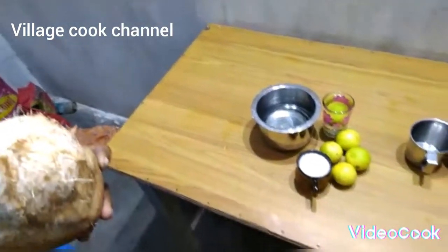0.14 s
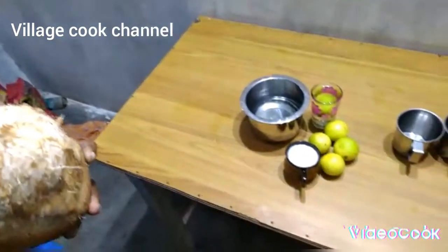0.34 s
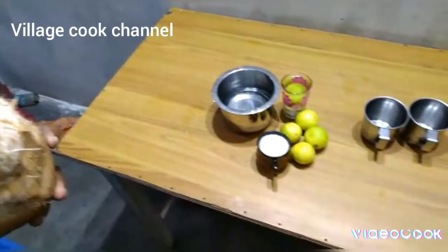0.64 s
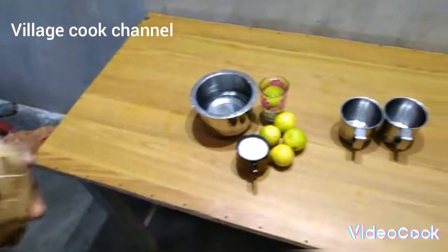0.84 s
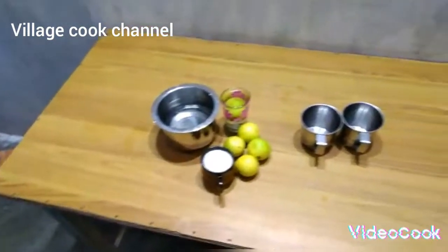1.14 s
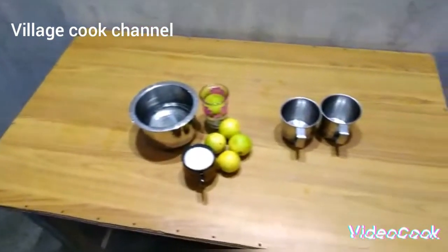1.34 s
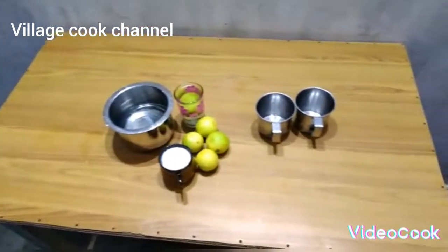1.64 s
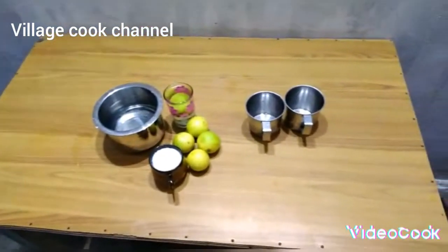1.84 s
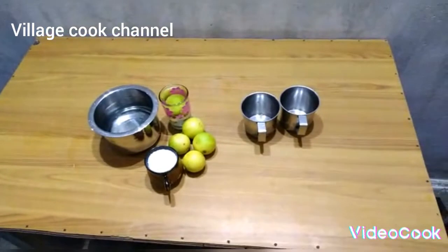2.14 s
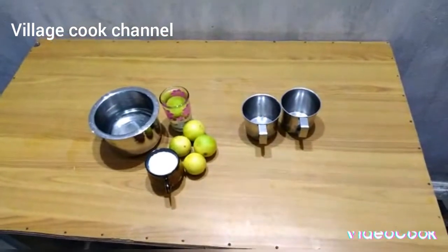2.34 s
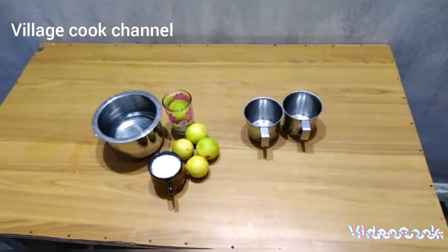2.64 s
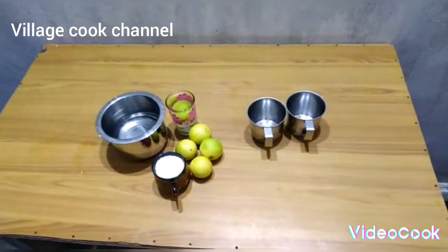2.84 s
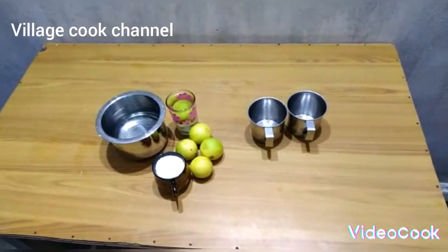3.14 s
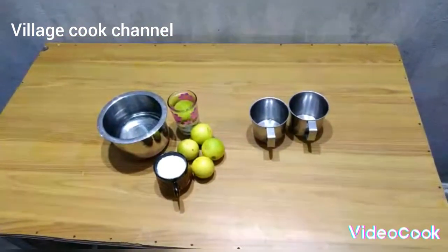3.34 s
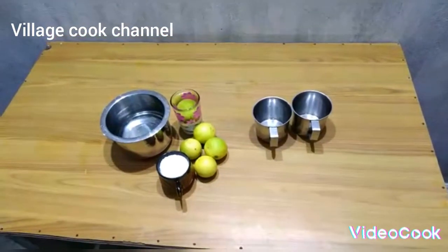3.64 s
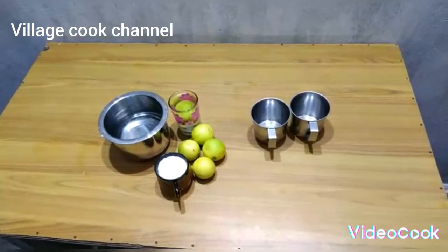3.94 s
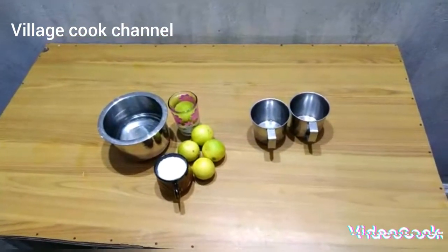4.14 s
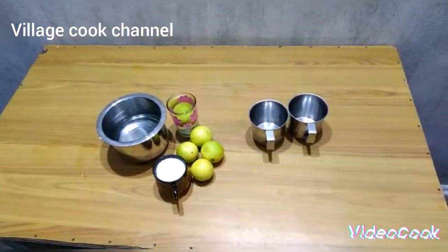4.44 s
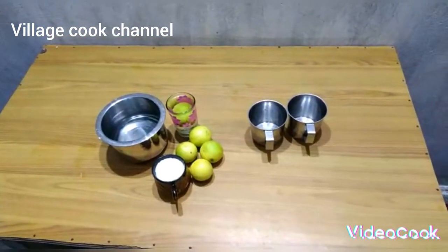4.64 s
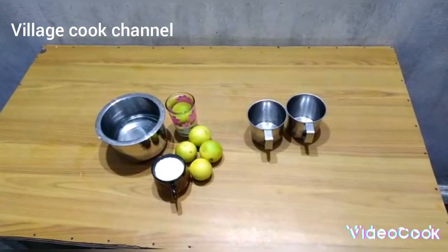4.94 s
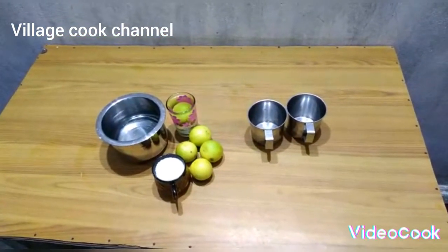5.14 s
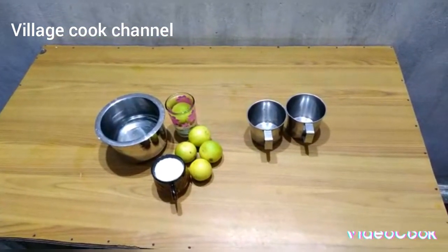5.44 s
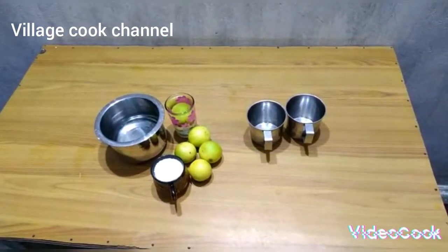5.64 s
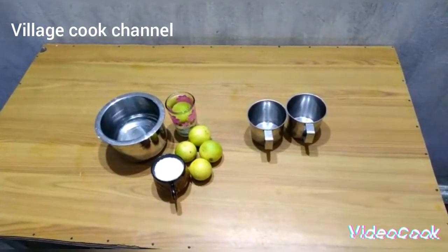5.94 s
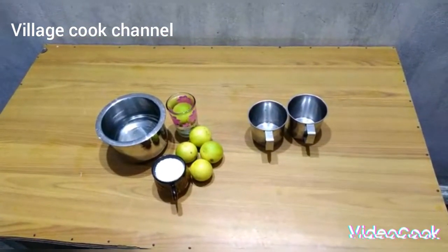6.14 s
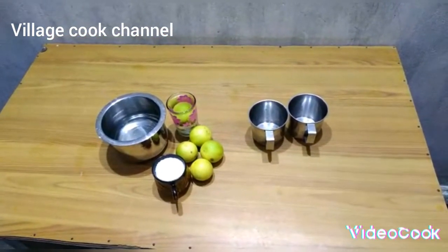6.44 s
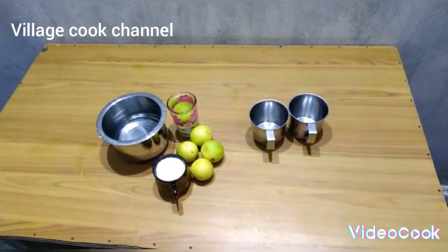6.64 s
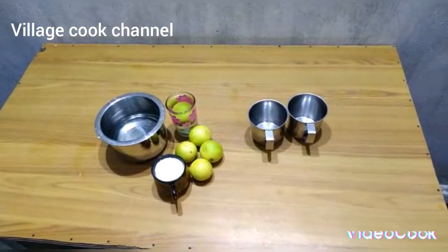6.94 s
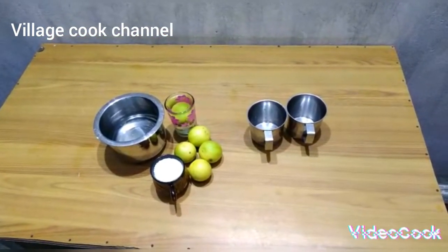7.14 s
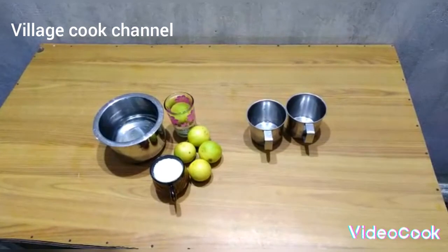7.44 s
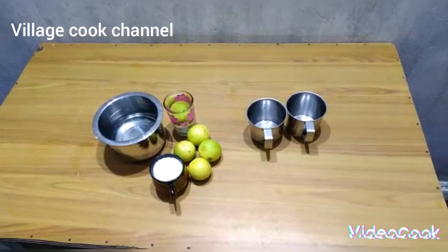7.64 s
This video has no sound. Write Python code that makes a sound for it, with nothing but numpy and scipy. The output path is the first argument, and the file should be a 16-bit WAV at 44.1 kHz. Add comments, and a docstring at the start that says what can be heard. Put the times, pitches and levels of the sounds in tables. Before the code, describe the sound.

Someone chops a coconut with uneven strokes, each dull tap followed by a hard crack of the blade through the husk. There are six hard cuts, slightly overloading the close microphone and echoing shortly in a hard-walled kitchen. Quiet snapping and rubbing of fibres fills some of the gaps. Underneath lies a soft hiss, louder in the first second, with barely audible far-off hoots and thin wavering tones.

```python
"""Chopping a green coconut

A heavy blade works the husk in a bare, ringing kitchen. Light knocks on the hollow nut alternate with
hard cuts that split the fibres; in between, the husk ticks and rustles. Faint thin tones and low hoots
waver over background hiss. A phone with two ports widens the stereo and overloads on the hardest cuts."""
import sys
import numpy as np
from scipy import signal
from scipy.fft import rfft, irfft
from scipy.io import wavfile
from scipy.ndimage import uniform_filter1d

SR = 44100
rng = np.random.default_rng(int(sys.argv[2]) if len(sys.argv) > 2 else 0)


def unload_audio(sound):
    """Save the sound as a 16-bit wav file, at the path given as the first command line argument."""
    columns = np.transpose(np.atleast_2d(sound))
    # keep every value between -1 and 1, then stretch to whole-number steps
    steps = np.round(np.clip(columns, -1, 1) * 32767)
    wavfile.write(sys.argv[1], SR, steps.astype(np.int16))


N = 343494
PORT_S, PORT_LIKENESS = 0.0004083, 0.87  # travel time between the ports; their likeness in the bass


def hard_cuts():
    """The blade splits the fibres: a bright crack with little ring from the shell."""
    # t/s, level/dB, thud/dB, knock f/Hz, knock/dB, treble/dB, rasp f/Hz, rasp/dB, splitting time/s
    hits = [(.8359, -17, 10, 719.4, 4.5, -3, 6780, 6, 0.0031),
            (1.7383, -20, -0.5, 575, 2.5, -3.5, 1546, 1.5, 0.0023),
            (2.6252, -20, -3.5, 994, 1, -2, 8500, 6, .0025),
            (4.0948, -19, 2, 1052, 6.5, -1, 5860, 5.5, 0.0021),
            (5.8409, -20, 5, 483, 3.5, -6.5, 2300, 3, .0018),
            (6.8015, -18.5, -8, 1260, 8, -3, 6500, 2.5, 0.0016)]
    # tone of a cut: f/Hz, level/dB
    spectrum = [(40, -32), (100, -18), (250, -7.5), (450, -1.5), (1000, 1.5), (1600, -2.5), (2200, 2.5),
                (3200, -7), (4200, -7), (5300, -12), (8000, -15.5), (11500, -14), (13500, -20.5),
                (15800, -35)]
    return blows(hits, spectrum, direct_db=-1, shell_db=-8)


def light_knocks():
    """The blade taps the nut: shorter and darker, with more of the hollow shell."""
    # t/s, level/dB, thud/dB, knock f/Hz, knock/dB, treble/dB, rasp f/Hz, rasp/dB, splitting time/s
    hits = [(.4431, -20.5, -2, 859, 8.2, 2, 3970, 2.5, 0.00045),
            (1.3802, -48.5, 4.5, 597.3, 1.8, 7.5, 1460, 4.4, .0015),
            (2.2566, -34, -3, 845, 4.4, 1, 3300, 3.3, 0.00061),
            (3.7046, -35, 3, 620, 4.7, -2, 8800, 5.7, .00066),
            (5.4578, -43.5, 8.5, 484, 2.6, 3.5, 2300, 2, 0.0014),
            (6.4606, -36, 5, 795, 2.04, 3, 1450, 3, 0.0013)]
    # tone of a knock: f/Hz, level/dB
    spectrum = [(40, -26.5), (100, -17.5), (250, -7.5), (450, -1.5), (750, 1), (1000, -7), (1700, -12),
                (2250, -10.5), (3200, -23.5), (5000, -31.5), (9000, -38.5), (15500, -50)]
    return blows(hits, spectrum, direct_db=2.5, shell_db=2)


def blows(hits, spectrum, direct_db, shell_db, thud_hz=300, treble_hz=3500):
    """Each blow thuds, knocks the nut at a pitch set by the spot struck, and rasps through husk."""
    out = np.zeros((2, N))
    for start, level_db, thud_db, knock_hz, knock_db, treble_db, rasp_hz, rasp_db, split_s in hits:
        def colour(hz):
            thud = thud_db / (1 + (hz / thud_hz) ** 2)
            treble = treble_db * hz ** 2 / (hz ** 2 + treble_hz ** 2)
            knock = knock_db * bump(hz, knock_hz, octaves=.3)
            rasp = rasp_db * bump(hz, rasp_hz, octaves=.2)
            return read(spectrum, hz) + thud + treble + knock + rasp
        add(out, start, strike(colour, level_db, split_s, direct_db, shell_db))
    return out


def strike(colour, level_db, split_s, direct_db, shell_db, size=32768, grain=.6):
    """A burst of fibre snaps rings the shell, reaches the ports by short paths, then fills the room."""
    # modes of the hollow shell: f/Hz, relative level/dB, t60/s
    nut_modes = [(474, -5, 0.077), (660, -5, .06), (816, 3.5, 0.14), (1388, 2.5, .15), (2320, -2.5, 0.015)]
    # straight path, then off table and wall: delay/s, left port's lag/s, level/dB
    paths = [(0, .0001, -1), (.0013, -.0001, -4), (.0028, .00004, -7.5)]
    # how the crack beams at the phone: f/Hz, relative level/dB
    beam = [(100, -5.5), (500, -3), (1100, -11.5), (2200, -2), (4000, 3.5), (12000, 1)]
    t, hz = np.arange(size) / SR, np.fft.rfftfreq(size, 1 / SR)
    snaps = rng.standard_normal(size) * np.exp(grain * rng.standard_normal(size) - t / split_s)
    burst = rfft(snaps)
    burst_db = 10 * np.log10(uniform_filter1d(abs(burst) ** 2, size=60) + 1e-12)
    burst /= causal(burst_db)  # flattened, so the nut sets the colour
    ring = sum(ringing(t, mode_hz * rng.uniform(.91, 1.02), db + shell_db, t60, np.pi / 2)
               for mode_hz, db, t60 in nut_modes)
    shell = 1 + rfft(ring)
    direct = 0
    for delay_s, lag_s, db in paths:
        arrival_s = delay_s * rng.uniform(.7, 1.3) + np.array([[lag_s], [0]])  # the nut shifts in hand
        direct = direct + gain_of(db) * np.exp(-2j * np.pi * hz * arrival_s)
    space = direct * causal(read(beam, hz) + direct_db) + rfft(kitchen())
    sound = irfft(burst * shell * causal(colour(hz)) * space)
    attack_rms = np.sqrt(np.mean(sound[:, :SR // 10] ** 2))
    return gain_of(level_db) * sound / attack_rms


def husk(centre_db=10, clumping=.71):
    """Single fibres snap, and rubbing sets off swarms of tiny ones."""
    # fibres snapping: t/s, level/dB
    ticks = [(2.089, -75.5), (4.033, -59), (5.376, -63), (5.792, -52), (6.766, -57.5), (7.363, -70),
             (7.392, -61.5), (7.64, -69)]
    # tone of a fibre: f/Hz, level/dB
    fibre = [(100, -28.5), (1000, -9.5), (2300, 10.5), (4000, -5.5), (7000, -3.5), (12000, -14),
             (16000, -19)]
    # husk rubbing under hand and blade: t/s, length/s, relative level/dB, centre f/Hz
    rubs = [(2.06, 0.066, -69, 7990), (4.69, 0.11, -69, 2914), (5.13, 0.099, -66.5, 4010),
            (5.253, 0.065, -56, 8880), (5.36, 0.2, -65, 2788), (5.6, 0.22, -66.5, 2480),
            (7.05, .25, -71.5, 1480), (7.54, 0.087, -58.5, 2150)]
    snaps, swarm = np.zeros((2, N)), np.zeros(N)
    for start, db in ticks:
        add(snaps, start, strike(lambda hz: read(fibre, hz), db, .0014, direct_db=1, shell_db=-12))
    hz = np.fft.rfftfreq(SR, 1 / SR)
    for start, length, db, centre_hz in rubs:
        grains = rng.standard_normal(SR) * np.exp(clumping * np.minimum(rng.standard_normal(SR), 2))
        colour_db = read(fibre, hz) + centre_db * bump(hz, centre_hz, octaves=1)
        rustle = unit_rms(irfft(rfft(grains) * gain_of(colour_db)))
        stroke = np.hanning(round(length * SR))
        add(swarm, start, gain_of(db) * stroke * rustle[:len(stroke)])
    return snaps + in_kitchen(swarm, direct=1.35, wet=1.53)


def kitchen(size=32768, build_s=.002, hold_s=.035, modes_db=5, late_db=-2, knee_s=.27):
    """Dense wall echoes that hold briefly and then die band by band, plus standing waves."""
    # reverb time: f/Hz, t60/s
    decay = [(80, 0.37), (300, 0.5), (700, 0.39), (1400, 0.44), (3000, 0.37), (6000, 0.37), (10000, .31),
             (15000, 0.19)]
    # standing waves: f/Hz, relative level/dB
    room_modes = [(113, 5), (165, -0.5), (233, 1), (277, 10.5), (438, 3.5), (479, 4), (573, 1.5), (603, 0),
                  (733, 1), (846, 1), (991, 2.5), (1037, 1), (1072, 4.5), (1147, 3), (1178, -2.5),
                  (1304, -2), (1379, 3)]
    t = np.arange(size) / SR
    hz, frame_s, bands = signal.stft(diffuse_noise(size), SR, nperseg=256)
    dying_s = np.hypot(frame_s, hold_s) - hold_s
    bands *= gain_of(-60 * dying_s / read(decay, hz)[:, None])
    tail = signal.istft(bands, SR, nperseg=256)[1][:, :size]
    tail /= np.linalg.norm(tail[0])
    for mode_hz, db in room_modes:
        phase = 2 * np.pi * rng.random() + rng.standard_normal((2, 1))
        t60 = .57 * (500 / mode_hz) ** .38
        tail += ringing(t, mode_hz, db + modes_db, t60, phase)
    build_up = 1 - np.exp(-(t / build_s) ** 2)
    return tail * build_up * gain_of(late_db * (t / knee_s) ** 2)  # the end dies faster


def in_kitchen(sound, direct, wet):
    """A mono sound blended with its stereo wall echoes."""
    return direct * sound + wet * signal.fftconvolve(sound[None], kitchen(), axes=1)[:, :N]


def thin_tones(swing_hz=3.5, depth=.013, growth_per_s=.16, fade_db_per_s=8):
    """Thin tones swing ever wider about their pitch; the room's echoes beat with the glide."""
    # thin wavering tones, with one brief bright flare in the last:
    # t/s, length/s, centre f/Hz, relative level/dB
    notes = [(.19, 0.1, 1454, -56), (3.873, 0.36, 1320, -53.5), (5.125, .46, 1490, -53.5),
             (5.337, .02, 1465, -46.5)]
    out = np.zeros(N)
    for start, length, hz, db in notes:
        t = np.arange(0, length, 1 / SR)
        swing = (depth + growth_per_s * t) * np.cos(2 * np.pi * swing_hz * t)
        add(out, start, tone(hz * (1 + swing), db - fade_db_per_s * t, flutter_db=3.3, ramps=.33))
    return in_kitchen(out, direct=.8, wet=.71)


def hoots(sag_hz_per_s=60, fade_db_per_s=22.5):
    """Low tones from far off, each sinking as it fades."""
    # far-off hoots: t/s, length/s, starting f/Hz, level/dB
    notes = [(1.42, 0.34, 439, -61), (2.35, 0.22, 435, -59), (3.239, 0.28, 447, -58.5),
             (3.55, 0.17, 393, -62), (4.481, 0.33, 457, -59.5), (6.241, .3, 442, -60),
             (6.573, 0.27, 399, -62), (7.162, 0.28, 398, -62.5)]
    out = np.zeros(N)
    for start, length, hz, db in notes:
        t = np.arange(0, length, 1 / SR)
        add(out, start, tone(hz - sag_hz_per_s * t, db - fade_db_per_s * t, flutter_db=3.5, ramps=.27))
    return out


def hiss(floor_db=-65, opening_db=-49, sag_db_per_s=4.5, hold_s=.86, release_s=.24,
         patchy_db=1.05, mids_hz=1600, rumble_hz=160, rumble_db=3.5):
    """Background hiss: a louder rush at first, then a steady floor with soft low swells."""
    # tone of the hiss: f/Hz, level/dB
    spectrum = [(30, -8.5), (100, -3.5), (250, 0), (450, -2), (700, -4.5), (1400, -9), (2300, -10.5),
                (3600, -14.5), (6500, -17), (11000, -23.5), (15500, -27)]
    # gentle swells: t/s, length/s, level/dB
    swells = [(1.0, 1.0, -65.5), (2.201, .8, -65), (3.6, 0.93, -59.5), (4.306, .9, -66.5),
              (4.997, 1.2, -59.5), (7.45, .7, -65)]
    hz, t, bands = signal.stft(diffuse_noise(N), SR, nperseg=1024, noverlap=768)
    patches = uniform_filter1d(rng.standard_normal(bands.shape[1:]), size=6, axis=0)
    patches = unit_rms(uniform_filter1d(patches, size=8, axis=1))
    held = np.clip(1 - (t - hold_s) / release_s, 0, 1)
    rush = held * gain_of(opening_db - sag_db_per_s * t)
    for start, length, db in swells:
        rush += gain_of(db) * np.sin(np.pi * np.clip((t - start) / length, 0, 1))
    mids, rumble = (1 / (1 + (hz[:, None] / edge_hz) ** 4) for edge_hz in (mids_hz, rumble_hz))
    mids_db = .3 + 5 * np.exp(-t / .35)  # extra body at the very start
    level = np.hypot(rush * gain_of(mids_db * mids + rumble_db * rumble), gain_of(floor_db))
    colour = unit_rms(gain_of(read(spectrum, hz)))[:, None]
    bands *= colour * level * gain_of(patchy_db * patches)
    return signal.istft(bands, SR, nperseg=1024, noverlap=768)[1][:, :N]


def diffuse_noise(size):
    """Noise from all sides: alike at both ports only where the waves are long."""
    left, other = rfft(rng.standard_normal((2, size)))
    same = PORT_LIKENESS * np.sinc(2 * PORT_S * np.fft.rfftfreq(size, 1 / SR))
    return irfft([left, same * left + np.sqrt(1 - same ** 2) * other], size)


def tone(hz, db, flutter_db, ramps, waver=.008):
    """A sine that fades in and out, unsteady in pitch and level."""
    drift, flutter = (unit_rms(uniform_filter1d(uniform_filter1d(noise, 600), 400))[:len(hz)]
                      for noise in rng.standard_normal((2, SR)))
    turns = np.cumsum(hz * (1 + waver * drift)) / SR
    envelope = gain_of(db + flutter_db * flutter) * signal.windows.tukey(len(hz), ramps)
    return envelope * np.sin(2 * np.pi * turns)


def ringing(t, mode_hz, db, t60, phase):
    """A dying sine whose spectral peak stands at db."""
    fade = gain_of(-60 * t / t60)
    return gain_of(db) * 2 * fade / fade.sum() * np.sin(2 * np.pi * mode_hz * t + phase)


def causal(db):
    """The spectrum of the tightest pulse that has these levels."""
    log_gain = np.log(gain_of(np.r_[db, db[-2:0:-1]]))
    return np.exp(signal.hilbert(log_gain).conj())[:len(db)]


def bump(hz, centre_hz, octaves):
    """A bell of height 1 on the log-frequency axis."""
    return np.exp(-(np.log2((hz + 1) / centre_hz) / octaves) ** 2)


def read(points, hz):
    """A breakpoint curve on the log-frequency axis."""
    f, value = np.transpose(points)
    return np.interp(np.log(hz + 1), np.log(f + 1), value)


def gain_of(db):
    return 10 ** (np.asarray(db) / 20)


def unit_rms(x):
    return x / np.sqrt(np.mean(x ** 2) + 1e-20)


def add(mix, start_s, sound):
    part = mix[..., round(start_s * SR):][..., :sound.shape[-1]]
    part += sound[..., :part.shape[-1]]


def scene():
    """Blows, husk, faint tones and hiss as they reach the two ports."""
    return hard_cuts() + light_knocks() + husk() + thin_tones() + hoots() + hiss()


def record(dry, cancel=.9, dip_hz=4910, dip_db=-5.5, edge_hz=16400):
    """Each channel subtracts the other port, delayed, for width; then EQ, overload and band limit."""
    # level mismatch of the ports: f/Hz, left minus right/dB
    tilt = [(60, 0.5), (200, -6), (600, -3.5), (1200, -1.5), (1850, 4), (2500, -1.5), (6000, -3),
            (12000, -1.5)]
    # phase mismatch of the ports: f/Hz, left's lead/rad
    lead = [(200, 0.15), (400, 0.97), (700, 1), (1000, 0.7), (1600, 0.41)]
    hz, ports = np.fft.rfftfreq(N, 1 / SR), rfft(dry)
    delay = np.exp(-2j * np.pi * hz * PORT_S)
    wide = ports - cancel * delay * ports[::-1]
    same = PORT_LIKENESS * np.sinc(2 * PORT_S * hz)
    wide /= np.sqrt(1 + cancel ** 2 - 2 * cancel * same * delay.real)  # keeps room sound flat
    lean = gain_of(read(tilt, hz) / 2) * np.exp(.5j * read(lead, hz))
    mic_dip = gain_of(dip_db * bump(hz, dip_hz, octaves=.1))
    shaped = irfft(wide * mic_dip * [lean, 1 / lean], N)
    clipped = shaped / (1 + shaped ** 8) ** (1 / 8)
    low_pass = signal.firwin(255, edge_hz, window=("kaiser", 8), fs=SR)
    return signal.oaconvolve(clipped, low_pass[None], "same")


dry = scene()
out = record(dry)
unload_audio(out)
```